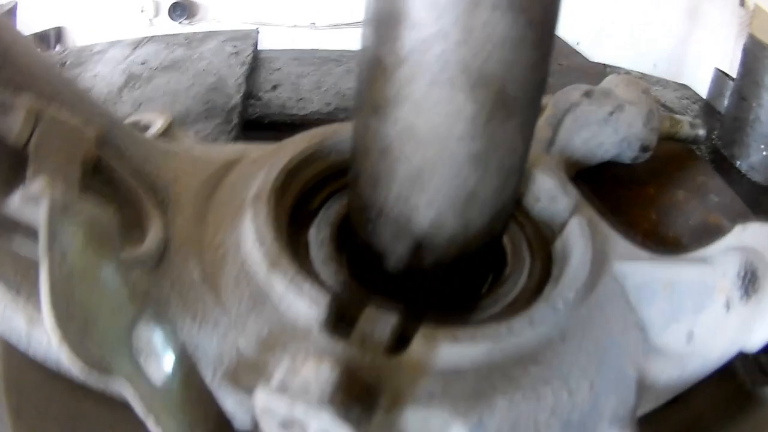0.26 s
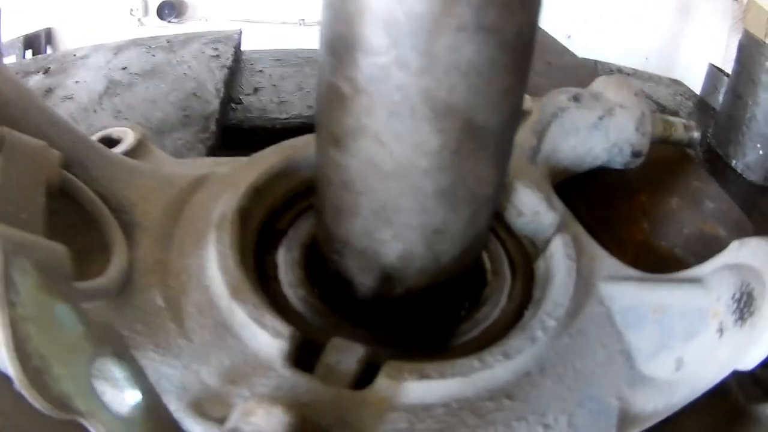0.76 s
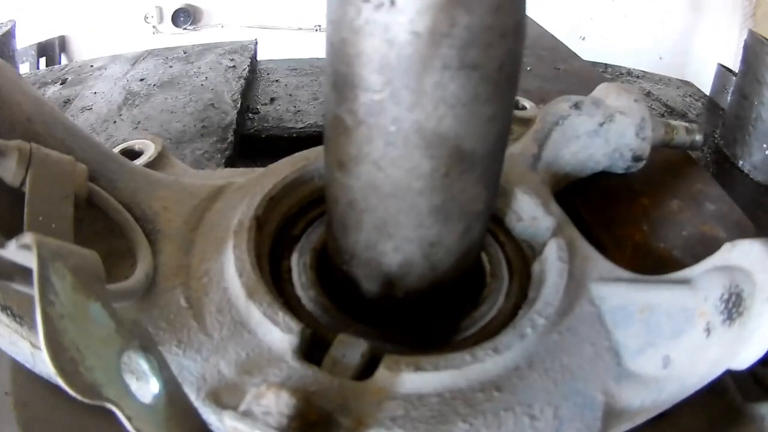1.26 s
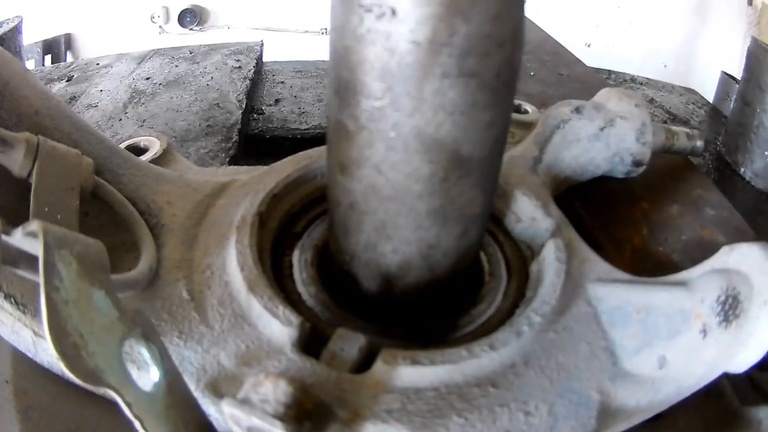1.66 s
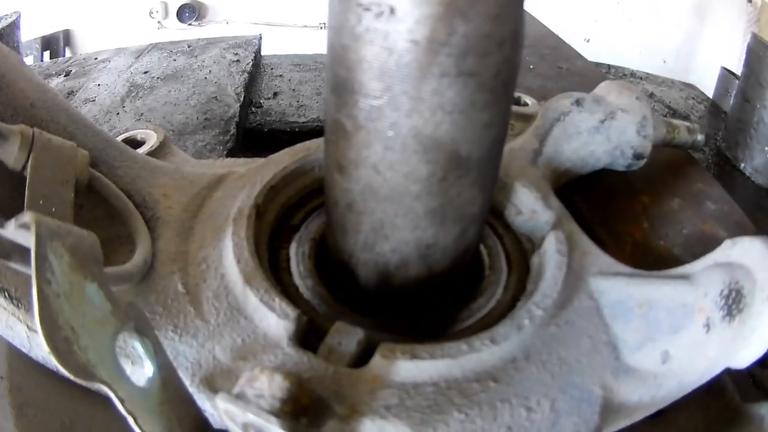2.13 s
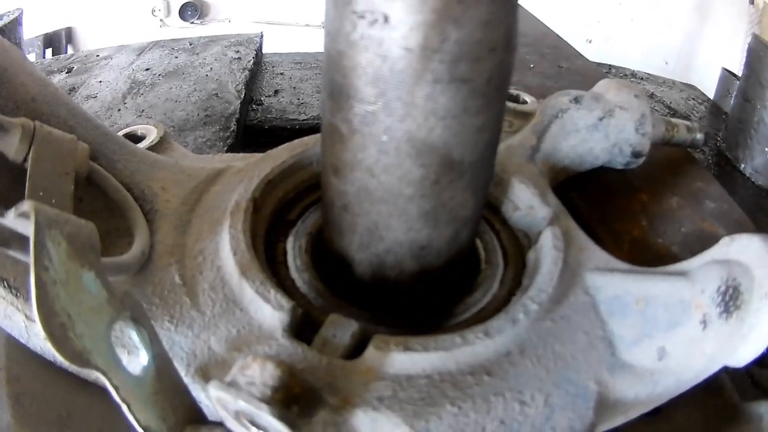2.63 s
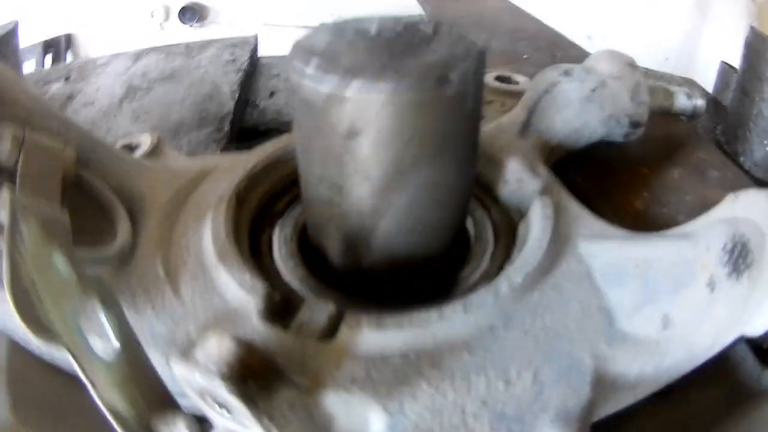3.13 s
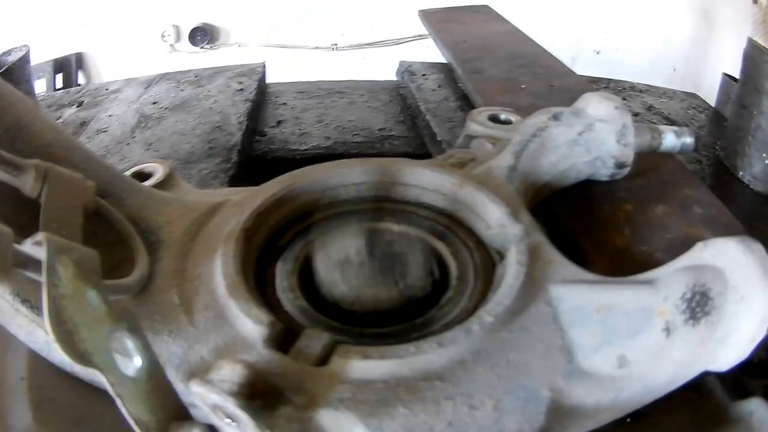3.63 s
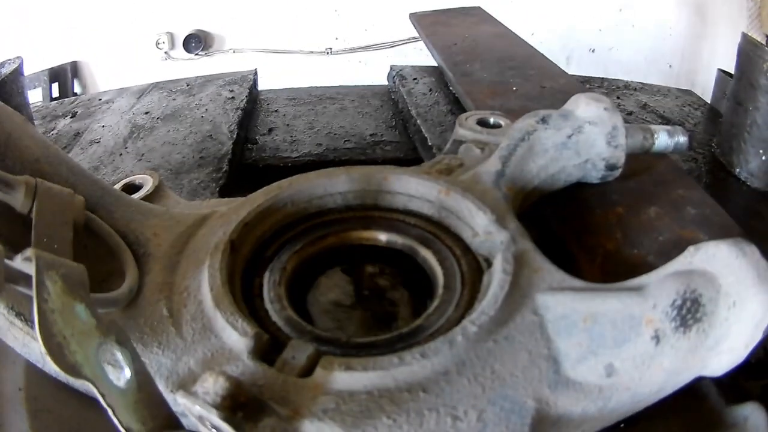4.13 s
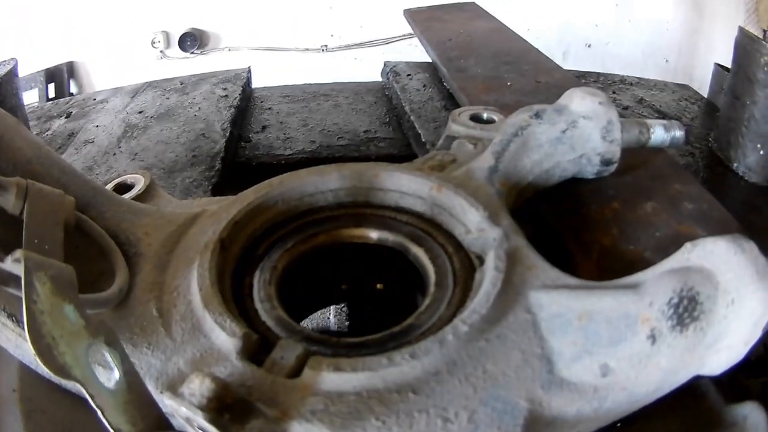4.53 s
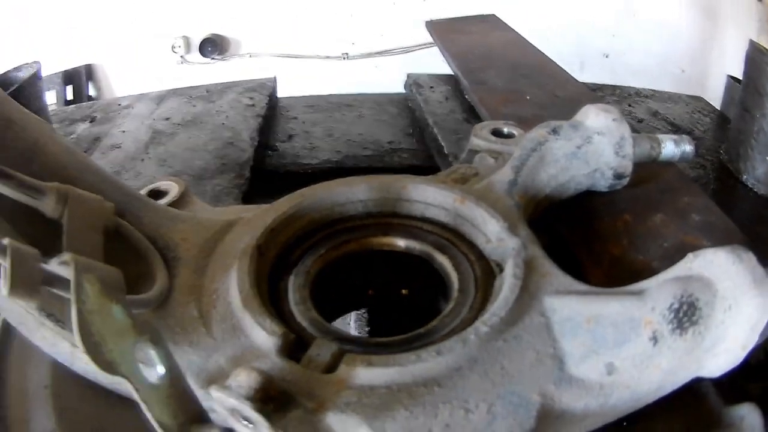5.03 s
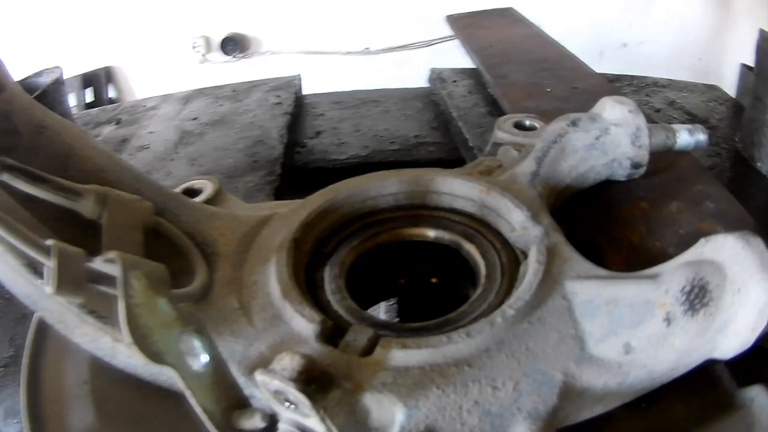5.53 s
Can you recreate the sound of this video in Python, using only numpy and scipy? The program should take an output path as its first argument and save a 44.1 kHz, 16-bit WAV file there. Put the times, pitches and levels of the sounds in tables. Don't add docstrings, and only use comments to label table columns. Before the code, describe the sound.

A pump motor runs throughout: a low, throbbing drone with soft fan hiss and thin gear whines, its throb slowly strengthening under load. Only a faint tick at about 1.9 s interrupts it. At 3.0 s a rusted hub gives way under the press with a very loud double bang, about 0.05 s apart; the second is louder, flattened by an overloaded small microphone. The steel frame rings for a fraction of a second over a floor thud. The bar knocks hard at 3.27 s, then a quick rattle and gritty scrape build from 3.5 s to a loud clack at 3.58 s as the hub drops, bouncing until 3.7 s. Small taps come at 4.13 s and 4.4 s, a sharper metal clank at 4.5 s, and light clinks at 4.77-4.92 s. At 5.36 s a distant slam blooms into hall echo while the drone continues to the end, around 5.8 s. Close blows have little echo.

```python
import sys
import numpy as np
from scipy import signal
from scipy.fft import rfft, irfft, next_fast_len
from scipy.io import wavfile
from scipy.ndimage import uniform_filter1d, map_coordinates

SR = 44100
rng = np.random.default_rng(int(sys.argv[2]) if len(sys.argv) > 2 else 0)


def log_audio(samples):
    frames = np.atleast_2d(samples).T
    limited = np.clip(frames, -1, 1)
    pcm = np.round(limited * 32767).astype(np.int16)
    wavfile.write(sys.argv[1], SR, pcm)


def attenuation_scalar(level_db):
    decades = np.asarray(level_db, float) / 20
    return 10 ** decades


N = 254898


def unit(x):
    return x / np.sqrt(np.mean(x ** 2) + 1e-20)


def peak1(x):
    return x / np.max(np.abs(x))


def along(points, hz):
    f, v = np.transpose(points)
    return np.interp(np.log(hz + 1), np.log(f + 1), v)


def wobble(rate):
    knots = rng.standard_normal(int(N * rate / SR) + 4)
    return map_coordinates(knots, [np.arange(N) * rate / SR])


def filtered(x, response):
    m = next_fast_len(len(x) + SR // 4)
    return irfft(rfft(x, m) * response(np.fft.rfftfreq(m, 1 / SR)), m)[:len(x)]


def noise(spectrum):
    return unit(filtered(rng.standard_normal(N), lambda hz: attenuation_scalar(along(spectrum, hz))))


def hall(x, decay):
    hz, t, z = signal.stft(rng.standard_normal(SR + SR // 2), SR, nperseg=256)
    fade = attenuation_scalar(-60 * t / along(decay, hz)[:, None])
    tail = signal.istft(z * fade, SR, nperseg=256)[1]
    late = np.pad(x, (250, 0))
    return signal.fftconvolve(late, tail / np.linalg.norm(tail))[:N]


def blows(table, modes, width, t60, crack_db, tilt_db, blur, hard):
    out = np.zeros(N + SR)
    t = np.arange(SR // 2) / SR
    early = t[:SR // 8]
    mode_hz, mode_db, mode_t60 = np.transpose(modes)[:, :, None]
    steps = rng.standard_normal((len(modes), len(t)))
    steps = uniform_filter1d(uniform_filter1d(steps, size=150), size=150)
    waver = blur * 800 / mode_hz * np.cumsum(steps, axis=1) / np.sqrt(SR)
    rings = attenuation_scalar(mode_db - 60 * t / mode_t60) * np.sin(2 * np.pi * mode_hz * t + waver)
    rings = rings * (1 - np.exp(-t / 0.00063))
    for start_s, level_db, pitch_hz, ring_db in table:
        def hollow(f):
            damping = 1j * f * width * pitch_hz
            resonance = damping / (pitch_hz * pitch_hz - f * f + damping)
            return resonance ** 2 / (1 + .4j * f / pitch_hz) ** 3

        def bright(f):
            return (1j * f / (2800 + 1j * f)) ** 3 / (1 + 1j * f / 3500) ** 4

        start = round(start_s * SR)
        shake = attenuation_scalar(-60 * early / t60) * 0.45 * rng.standard_normal(len(early))
        shake[0] += 1.4
        knock = peak1(filtered(shake, hollow))
        crack = peak1(filtered(shake * attenuation_scalar(-60 * early / .004), bright))
        bright_db = crack_db + tilt_db * np.log2(pitch_hz / 1300) + hard * (level_db + 18.5)
        out[start:][:len(early)] += attenuation_scalar(level_db) * (knock + attenuation_scalar(bright_db) * crack)
        strengths_db = rng.normal(0, 2, len(modes))
        out[start:][:len(t)] += attenuation_scalar(level_db + ring_db + strengths_db) @ rings
    return out[:N]


def thuds(table, t60):
    out = np.zeros(N + SR)
    t = np.arange(SR // 4) / SR
    for start_s, level_db, pitch_hz in table:
        swing = np.sin(2 * np.pi * pitch_hz * t) * (1 - np.exp(-t * pitch_hz * 4))
        out[round(start_s * SR):][:len(t)] -= attenuation_scalar(level_db - 60 * t / t60) * swing
    return out[:N]


# start_s, level_db (peak), gap_s, first_pitch_hz, later_pitch_hz
BURSTS = [
    (3.0125, -18.5, .004, 900, 1404),
    (3.0578, -9, .0045, 872, 1654),
]
# start_s, level_db (peak), pitch_hz, ring_db (over the knock)
BREAK_KNOCKS = [
    (3.001, -44.5, 880, -10),
    (3.03, -22.5, 1020, -24.5),
    (3.094, -29.5, 990, -20.5),
    (3.136, -42, 990, -21),
]
# pitch_hz, level_db, t60_s (time to die by 60 dB)
FRAME_MODES = [(237.4, -5, 0.39), (472.5, -9.5, 0.2), (536.4, 2, 0.5), (705, 0, 0.13), (750, -1, 0.23),
               (896, -17, 0.28), (990, -20.5, 0.22), (1217, 6, 0.17), (1375, -5.5, 0.25), (1627, 7.5, 0.14),
               (1880, -13, 0.1), (1968, -16, 0.22), (3310, -13, 0.1), (3200, -9.5, 0.2),
               (4040, -20.5, 0.072), (4510, -20.5, 0.1), (4970, -24, 0.2), (6000, -29.5, 0.099),
               (6150, -49, .11)]
# start_s, level_db (peak), pitch_hz
THUDS = [
    (3.009, -21.5, 522),
    (3.015, -17, 575),
    (3.023, -20.5, 443),
    (3.057, -7, 320),
    (3.064, -34, 517),
    (3.269, -23.5, 308),
    (3.579, -32, 410),
    (5.364, -29, 332),
]
# start_s, level_db (peak), pitch_hz
FLOOR_THUDS = [
    (3.007, -25.5, 123),
    (3.012, -27.5, 130),
    (3.056, -34.5, 110.6),
    (3.27, -35, 142),
]


def hub_breaks_free():
    slips = []
    for start_s, level_db, gap_s, first_hz, later_hz in BURSTS:
        for k in range(4):
            pitch_hz = later_hz if k else first_hz
            slips.append((start_s + k * gap_s, level_db - k * 1.3, pitch_hz, -18))
    knocks = blows(slips + BREAK_KNOCKS, FRAME_MODES, width=1.0, t60=0.051,
                   crack_db=-17.5, tilt_db=23, blur=12, hard=0.29)
    return knocks + thuds(THUDS[:-1], t60=0.03) + thuds(FLOOR_THUDS, t60=0.11)


# start_s, level_db (peak), pitch_hz, ring_db (over the knock)
BAR_KNOCKS = [(3.219, -33.5, 1350, -23), (3.251, -34, 2440, -22), (3.27, -22, 950, -13),
              (3.274, -19, 1300, -22), (3.2795, -28, 1420, -10.5), (3.428, -42, 2060, -9),
              (3.452, -46, 3000, 1.5), (3.503, -38, 2800, -9), (3.584, -18.5, 1380, -9),
              (3.597, -23, 1200, -19), (3.6225, -35.5, 1710, -1), (3.638, -33, 1450, -15),
              (4.128, -39.5, 1970, -5.5), (4.142, -45.5, 2080, -0.5)]
# start_s, level_db (peak), pitch_hz, ring_db (over the knock)
TICKS = [
    (.1, -72, 4270, 0),
    (1.949, -53, 1910, -11),
    (4.295, -67, 4200, -26),
    (4.392, -49, 1800, -11),
    (4.819, -70, 4000, -14),
]
# pitch_hz, level_db, t60_s
BAR_MODES = [(1065, -4, .15), (1145, -8, .14), (1243, -5, .14), (1450, -7, .13), (1635, -11, .13),
             (2100, 0, .16), (2140, -4, .12), (3122, -15, .1), (3332, -18, .11), (3607, -18, .1),
             (4100, -17, .08), (4323, -19, .1), (4693, -13, .17), (5103, -20, .19), (5750, -23, .1),
             (6400, -28, .08)]


def bar_knocks():
    rattle = [(3.4925 + k * .0216, -44 + k * 3, 2800, -5.5) for k in range(4)]
    return blows(BAR_KNOCKS + rattle + TICKS, BAR_MODES, width=0.76, t60=0.039,
                 crack_db=-9, tilt_db=5.5, blur=9.8, hard=.4)


# start_s, level_db
SLIDE_PEAKS = [
    (3.26, -68),
    (3.35, -84),
    (3.491, -50.5),
    (3.599, -40.5),
    (3.76, -67),
    (4.15, -73),
]
# pitch_hz, level_db (per Hz)
GRIT_COLOUR = [(600, -17), (1000, 2), (2100, 0), (2600, -1), (3100, 11), (3700, -37), (4300, -1.5),
               (5500, -23), (7000, -26), (8000, -30)]


def slide():
    t = np.arange(N) / SR
    grip_db_per_s, slack_db_per_s = 298.5, 215
    ramps = [level_db - np.maximum(grip_db_per_s * (start_s - t), slack_db_per_s * (t - start_s))
             for start_s, level_db in SLIDE_PEAKS]
    level = np.max(ramps, axis=0)
    draw = rng.random((2, N))
    caught = draw[0] < 1600 / SR
    grains = caught * attenuation_scalar(-3 * np.log(draw[1] + .02)) * np.sign(rng.standard_normal(N))
    grit = unit(filtered(grains, lambda hz: attenuation_scalar(along(GRIT_COLOUR, hz))))

    def bar(f):
        return sum(attenuation_scalar(db) * 1j * f / (hz * hz - f * f + 1j * f * 3 / t60) for hz, db, t60 in BAR_MODES)

    return attenuation_scalar(level - 1.0) * (grit + 0.71 * unit(filtered(grains, bar)))


# start_s, level_db (peak), pitch_hz, ring_db (over the knock)
HUB_CLINKS = [
    (3.5797, -8, 1400, -57),
    (3.645, -25, 1450, -14),
    (3.6596, -19.5, 1405, -46),
    (3.673, -28, 1135, -24),
    (3.682, -34, 1250, -32),
    (4.5015, -20.5, 1280, -23.5),
    (4.513, -30.5, 1060, -39),
    (4.767, -34.5, 1300, -44),
    (4.854, -38, 1420, -15.5),
    (4.916, -45.5, 1430, -37),
]
# pitch_hz, level_db, t60_s
RIM_MODES = [(1075, 1, .09), (1455, -7, .06), (3973, -13, .45), (3985, -13, .5), (4680, -26, .25),
             (5012, -28, .2), (5136, -27, .3), (5744, -30, .45), (6600, -32, .14), (8500, -30, .1)]


def hub_clinks():
    return blows(HUB_CLINKS, RIM_MODES, width=.4, t60=.012, crack_db=-29, tilt_db=3, blur=0, hard=1.2)


# start_s, level_db (peak), pitch_hz, ring_db (over the knock)
DOOR_KNOCKS = [
    (5.3615, -15.5, 1110, -61),
    (5.356, -26, 890, -57),
    (5.366, -21, 1100, -58),
    (5.377, -26.5, 1400, -55),
]
# pitch_hz, t60_s
PORCH_DECAY = [(200, 0.33), (1500, 0.26), (6000, 0.087)]
# pitch_hz, t60_s
HALL_DECAY = [(150, 2.4), (500, 2.03), (1500, 1.35), (4000, 1.73), (7000, 0.53)]
# pitch_hz, level_db
DISTANCE = [(100, -0.5), (200, 0.5), (500, -2.5), (1200, 0.5), (3000, 4), (4500, 5), (6000, -1), (7000, -7),
            (8000, -30)]


def door():
    knocks = blows(DOOR_KNOCKS, FRAME_MODES, width=1.55, t60=.004,
                   crack_db=-19, tilt_db=2, blur=30, hard=.8)
    knocks = knocks + thuds(THUDS[-1:], t60=.012)
    low_hz, top_hz = 457, 1200
    push = attenuation_scalar(14) * (np.arange(N) == round(DOOR_KNOCKS[0][0] * SR))
    push = filtered(push, lambda f: 1j * f / (low_hz + 1j * f) / (1 + 1j * f / top_hz) ** 3)
    tail = attenuation_scalar(2.5) * hall(push, PORCH_DECAY) + attenuation_scalar(-0.5) * hall(push, HALL_DECAY)
    return filtered(knocks + tail, lambda hz: attenuation_scalar(along(DISTANCE, hz)))


# start_s, level_db
LOAD = [
    (0.0, -57.5),
    (0.31, -56.5),
    (1.59, -50),
    (3.01, -48.5),
    (4.64, -47),
    (5.78, -45),
]
# multiple (of the shaft's turning rate), level_db
THROB = [(2, -12), (3, -2), (4, -3.5), (5, 3), (6, -3.5), (7, -9.5), (8, -6.5), (9, 0), (10, -7), (11, 1.5),
         (13, 5.5), (14, 3.5), (16, -23.5), (20, -1.5), (25, -9.5)]
# pitch_hz, level_db (per Hz)
DRONE_COLOUR = [(30, -38.5), (45, -4), (90, -11.5), (140, 1), (198, -11), (312, 0), (420, -1), (492, -7),
                (623, -3), (740, -7), (850, -3.5), (945, -7), (1030, -10.5), (1430, -17), (1700, -46.5),
                (2200, -59)]
# pitch_hz, level_db (per Hz)
FAN_COLOUR = [(900, -15), (1500, 4.5), (2000, -4), (2400, -6), (2800, -13), (3200, -19), (3700, -27.5),
              (4300, -19.5), (5000, -33.5), (6500, -38.5), (8000, -47)]
# pitch_hz, width_hz (how fast they wander), level_db (rms)
WHINES = [(627.3, 12, -59.5), (817, 8.8, -66.5), (856, 6, -58), (917, 5.5, -60), (1890, 11, -80),
          (2240, 12, -91), (2649, 5.5, -72), (4425, 60, -119)]


def pump():
    t = np.arange(N) / SR
    load_s, load_db = np.transpose(LOAD)
    throb_db = np.interp(t, load_s, load_db)
    drone_db = -47.5 - 0.2 * (throb_db - throb_db.mean())
    shaft_hz = 16.66 * (1 + 0.0043 * wobble(1.581))
    turn = 2 * np.pi * np.cumsum(shaft_hz) / SR
    throb = sum(attenuation_scalar(db + 0.44 * wobble(1.7)) * np.sin(k * turn + 7 * rng.random()) for k, db in THROB)
    beat = 1 + 0.1 * np.cos(4 * turn) + 0.092 * np.cos(turn)
    drone = beat * attenuation_scalar(0.8 * wobble(4.67)) * noise(DRONE_COLOUR)
    fan = attenuation_scalar(0.8 * wobble(3.4)) * noise(FAN_COLOUR)
    flutter = .45 * np.clip(t / 0.54, 0, 1) ** 2 * np.cos(turn)
    whine = np.zeros(N)
    for hz, width_hz, db in WHINES:
        pulse = 1 + flutter * (hz > 2000)
        swell = np.sqrt(2) * attenuation_scalar(db + 1.2 * wobble(width_hz))
        whine += pulse * swell * np.sin(2 * np.pi * hz * t + 0.84 * wobble(width_hz))
    return attenuation_scalar(throb_db - 4.5) * unit(throb) + attenuation_scalar(drone_db) * unit(drone) + attenuation_scalar(-63.5) * fan + whine


# pitch_hz, t60_s
NOOK_DECAY = [(150, .5), (500, 0.87), (1500, 0.42), (4000, 0.49), (7000, 0.069)]


def room_echo(bang, near):
    echo = attenuation_scalar(-21.5) * hall(bang, NOOK_DECAY) + attenuation_scalar(-18.0) * hall(bang, HALL_DECAY)
    echo = echo + attenuation_scalar(-14) * hall(near, NOOK_DECAY)
    return filtered(echo, lambda hz: 1 / (1 + 1j * hz / 5500) ** 3)


def scene():
    bang = hub_breaks_free()
    near = bar_knocks() + hub_clinks() + slide()
    return (bang + near + door() + pump() + room_echo(bang, near))[None]


def roll_off(x):
    return signal.sosfilt(signal.butter(12, 15750, fs=SR, output="sos"), x)


# pitch_hz, level_db
MIC = [(22, -16), (45, 1.5), (6000, -4), (7200, -11.5), (7700, -10), (7950, -34.5)]
# pitch_hz, level_db
MIRROR = [(8000, 3.5), (9000, 2.5), (11000, -26.5), (13500, -45), (15000, -58)]


def record(dry):
    rate_hz, edge = 16000, SR // 10
    x = dry[0] / (1 + np.abs(dry[0] / .183) ** 8) ** (1 / 8)
    x = np.pad(x, edge, "reflect", reflect_type="odd")
    x = filtered(x, lambda hz: attenuation_scalar(along(MIC, hz)) * (hz < rate_hz / 2))
    mirror = x * np.cos(2 * np.pi * rate_hz * np.arange(len(x)) / SR)
    x = x + filtered(mirror, lambda hz: attenuation_scalar(along(MIRROR, hz)) * (hz > rate_hz / 2) * (hz < rate_hz))
    mix = x[edge:][:N] + attenuation_scalar(-93.5) * rng.standard_normal(N)
    return roll_off(mix[None])


dry = scene()
out = record(dry)
log_audio(out)
```